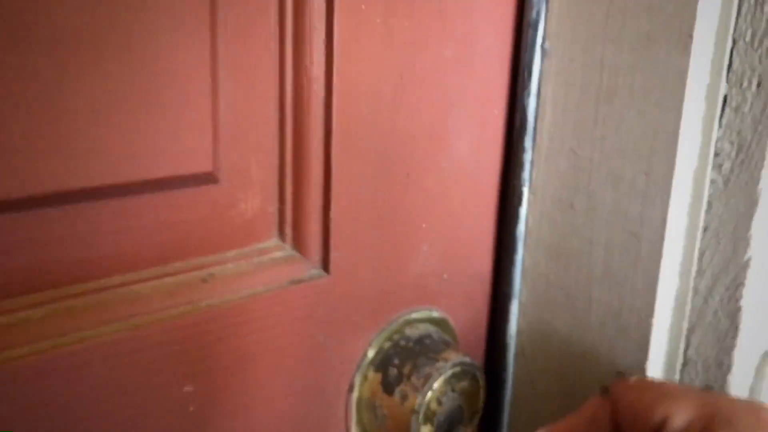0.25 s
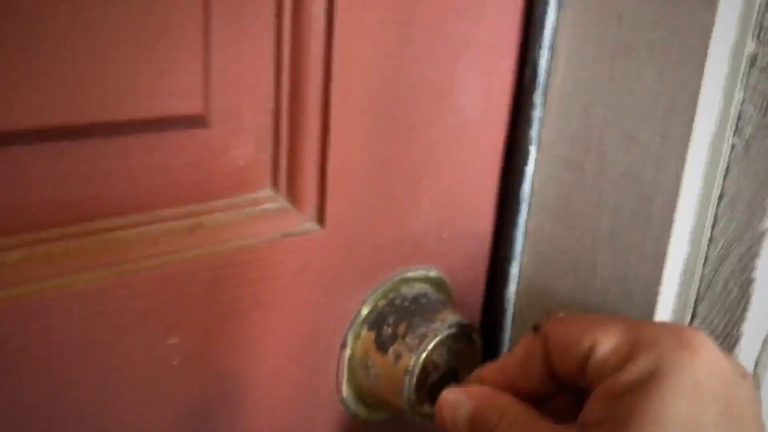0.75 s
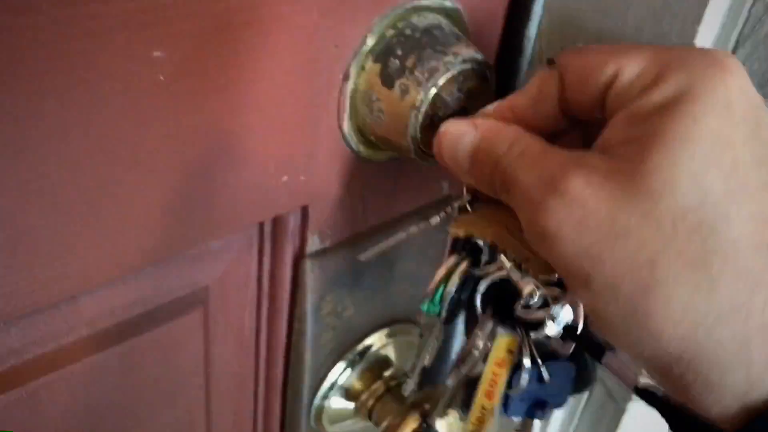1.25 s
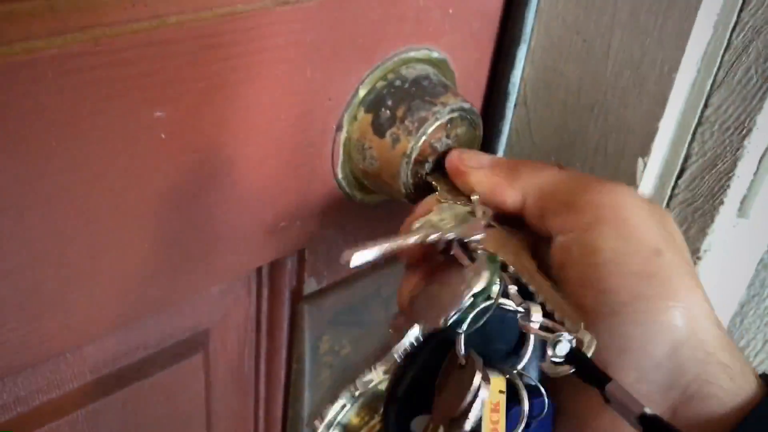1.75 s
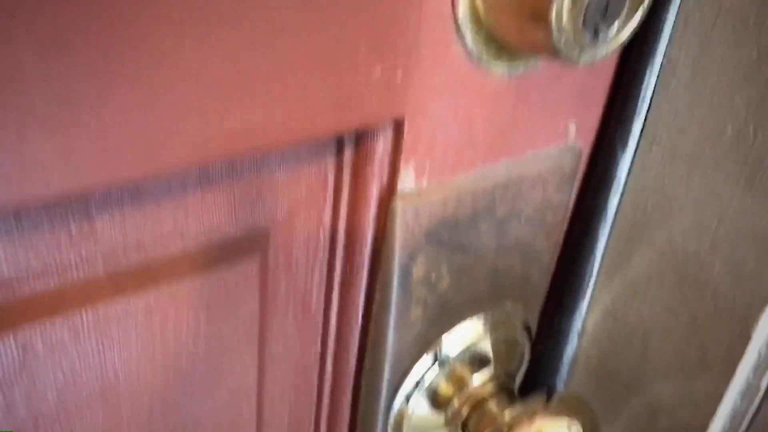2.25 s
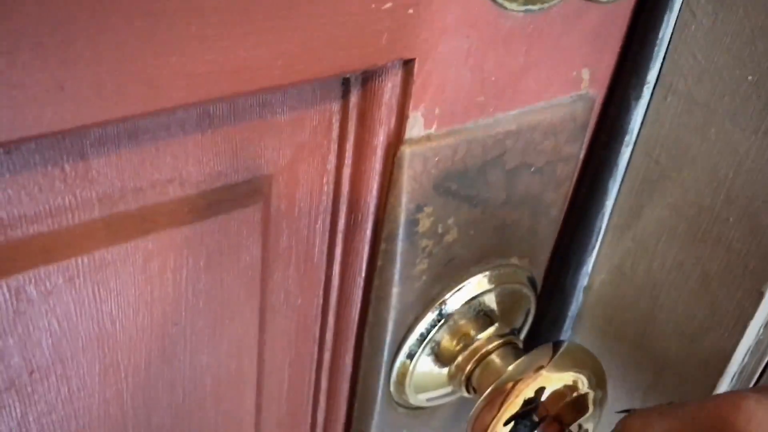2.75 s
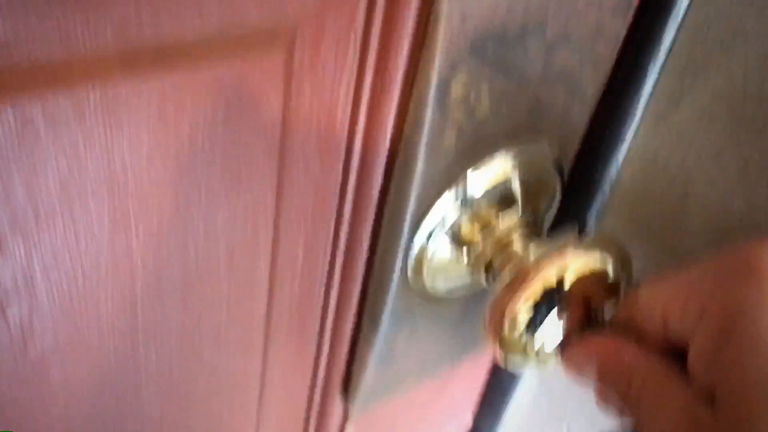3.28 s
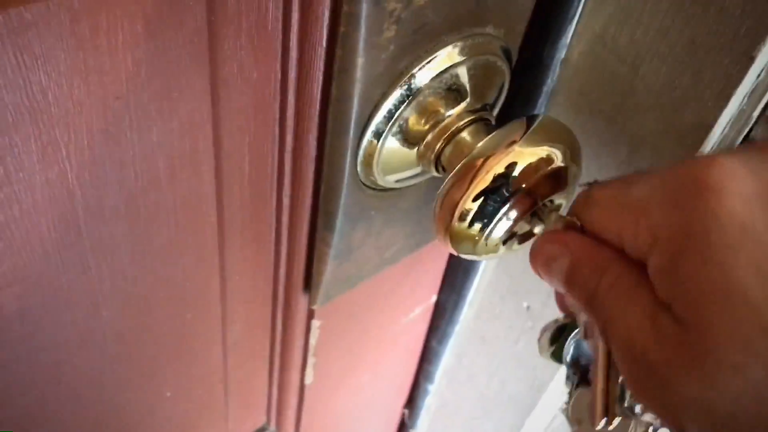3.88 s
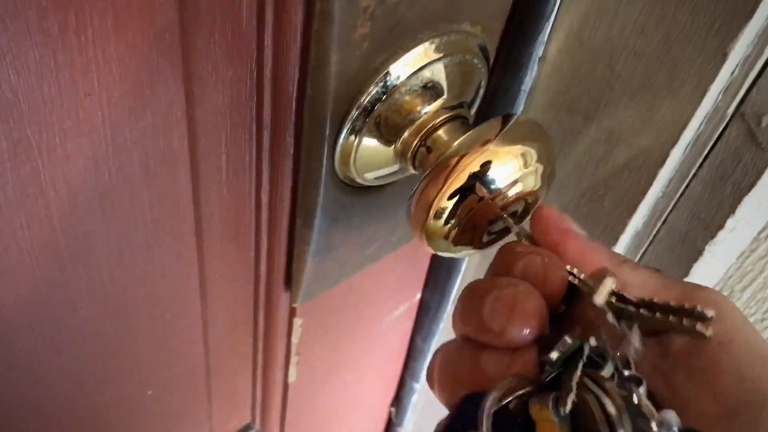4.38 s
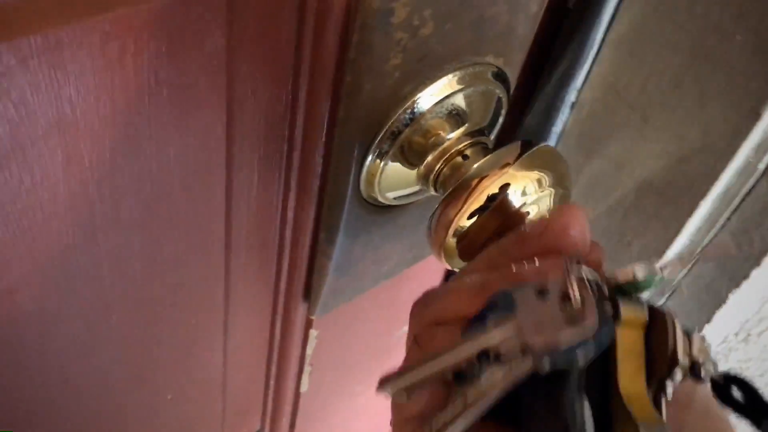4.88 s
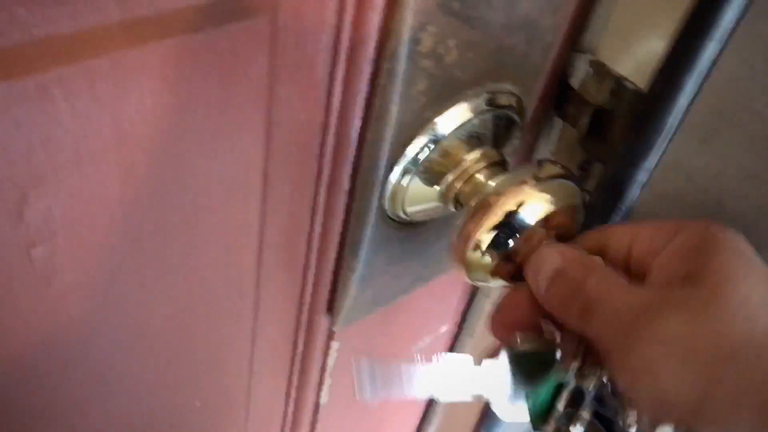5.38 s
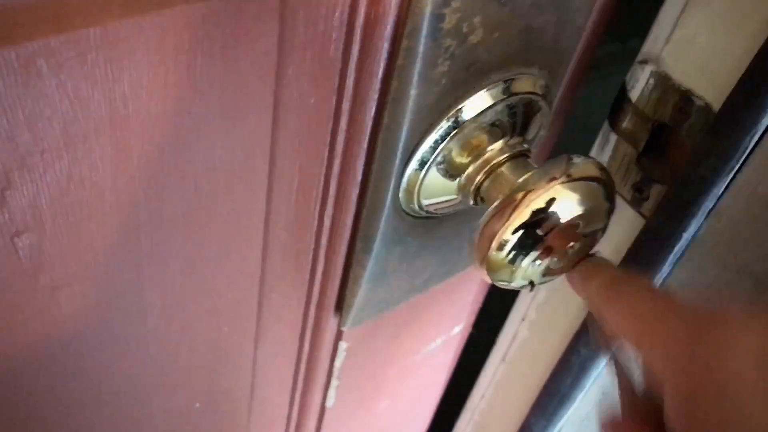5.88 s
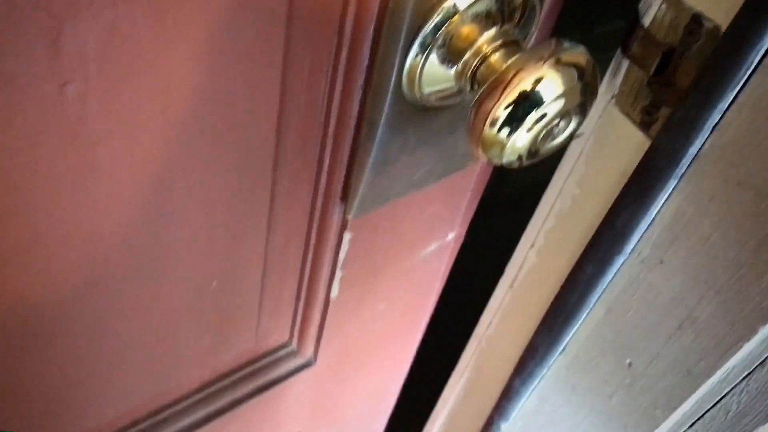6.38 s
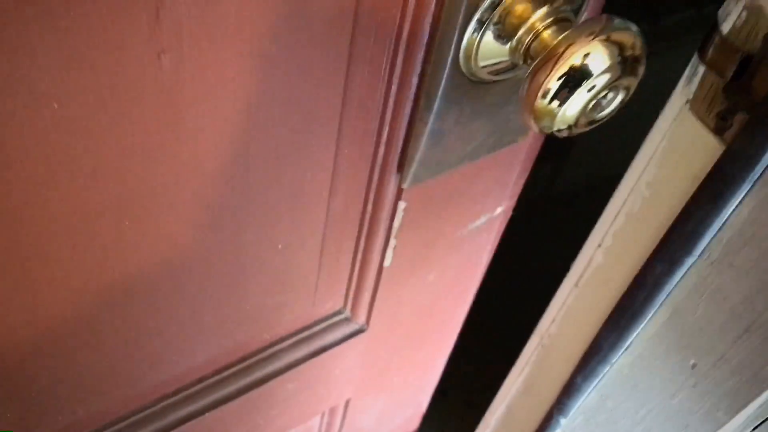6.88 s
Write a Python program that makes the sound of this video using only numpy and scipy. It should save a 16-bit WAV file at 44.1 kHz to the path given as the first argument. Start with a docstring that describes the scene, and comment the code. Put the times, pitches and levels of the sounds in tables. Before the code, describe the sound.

Close, dry lock clicks and key rasps on a solid door, with plastic tags clacking and keys jangling brightly over a faint low outdoor rumble.

```python
"""A faint squeak over a low outdoor rumble opens the scene; then a key knocks in the deadbolt of a wooden front door.
The hand draws it out, unlocks the knob below and lets the bunch swing: keys clink and plastic tags clack.
Locks, door, keys and tags are sums of decaying modes plus shaped noise; the sliding blade is a train of random slips.
Filtered noise makes the outdoor background, and a porch adds a short echo to all the near sounds."""
import sys
import numpy as np
from scipy import signal
from scipy.fft import rfft, irfft, next_fast_len
from scipy.io import wavfile

SR = 44100
rng = np.random.default_rng(int(sys.argv[2]) if len(sys.argv) > 2 else 0)


def wav_out(sig):
    """Save sig, one row per channel (or a flat mono array), as 16-bit PCM at SR to the path in sys.argv[1]."""
    wavfile.write(sys.argv[1], SR, np.round(np.clip(np.atleast_2d(sig).T, -1, 1) * 32767).astype(np.int16))


N = 314874
TIME = np.arange(N) / SR  # s, whole scene
AGE = np.arange(6000) / SR  # s since the start of one impact

# blows inside the locks: t/s, relative strength/dB, hardness/dB (high: steel on steel, low: a dull thud)
LOCK_BLOWS = [(0.345, -20.5, -34), (0.355, -18.5, -41), (0.497, -26, -23), (0.539, -27, -40),
              (0.694, -34, 6), (0.738, -29, -20), (0.777, -25, 11.5), (0.822, -20, -32), (1.025, -30.5, 5),
              (1.043, -29, 5), (1.546, -21, -12), (2.237, -26.5, -18), (2.313, -26, -9), (2.357, -24, -10),
              (2.447, -25, -4), (2.626, -31, -26), (2.659, -24.5, -46), (2.752, -31, -6), (2.796, -29, -1),
              (3.154, -35, 0), (3.186, -24.5, -7), (3.206, -20, -15), (3.301, -19, -2.5),
              (3.48, -21.5, -19), (3.505, -28, -8), (3.63, -36.5, 10), (3.912, -29, 0), (3.996, -29, -0.5),
              (4.302, -15, 9), (4.326, -18.5, -5), (4.686, -25, -25), (4.988, -31, -14.5),
              (5.048, -36.5, 14), (5.325, -25, -1.5), (5.378, -10.5, 0.5), (5.393, -15, -8),
              (5.715, -25.5, -21), (5.826, -26, -72), (5.873, -15, -25), (5.883, -20.5, -12),
              (5.928, -33, 23.5), (5.969, -24, 4), (6.576, -37.5, -25)]
# modes of the door with its locks: f/Hz, width/Hz, relative level/dB
DOOR_MODES = [(599, 40, 8.5), (909, 42, 6.5), (1100, 14.5, 1.5), (1538, 54, 4.5), (1870, 30, -31),
              (2590, 22, -1), (3085, 66, 2), (3580, 55, -14), (4120, 53, 1), (4610, 79, 2), (6110, 67, -15)]
# mean spectra of the dense modes of door panel, brass housing, steel parts and ringing keys: f/Hz, relative level/dB
PANEL_SPECTRUM = [(90, -17), (170, -16), (300, 10.5), (460, -6.5), (900, 1), (1650, 2.5), (2100, -11),
                  (4000, -30)]
HOUSING_SPECTRUM = [(900, -35), (2000, -2.5), (3200, 1.5), (4700, -7.5), (6200, -13), (9000, -27)]
STEEL_SPECTRUM = [(2500, -29), (6000, 3), (9000, 2), (12000, -5), (15500, 1)]
RING_SPECTRUM = [(1500, -26), (4000, -19), (7000, -3.5), (9000, -5.5), (11000, 0), (13500, 3), (15500, 0.5)]
BLOW_T60_S, BLOW_T60_GROWTH = 0.049, 0.0072  # base decay of a hard blow; relative change per dB of hardness below 0
DEADBOLT_BRASS_DB, KNOB_BRASS_DB = -11, -5.5  # offsets of the brass: the hollow knob rings more than the deadbolt
BRASS_PER_HARDNESS = 0.17  # dB per dB
AT_KNOB_S = 2.1  # from here on the knob is struck


def locks():
    """Impact excitation: each blow ticks on steel, rattles the brass housing and sounds the door panel."""
    out = np.zeros(N)
    hz, width, db = np.transpose(DOOR_MODES)
    wood = hz < 2000
    chances = rng.standard_normal((len(LOCK_BLOWS), 7, len(AGE)))
    for (s, panel_db, hardness), chance in zip(LOCK_BLOWS, chances):
        # a hard blow puts more into the metal, a dull one dies sooner
        tick_db = panel_db + hardness
        housing_db = DEADBOLT_BRASS_DB if s < AT_KNOB_S else KNOB_BRASS_DB
        brass_db = panel_db + BRASS_PER_HARDNESS * hardness + housing_db
        t60 = BLOW_T60_S * np.exp(BLOW_T60_GROWTH * min(hardness, 0))

        # the pressing hand detunes the modes a little from blow to blow
        pitch = hz * (1 + 0.013 * chance[5, :len(hz)])
        weight = db + 3 * chance[3, :len(hz)]
        phase = np.pi * chance[4, :len(hz)]
        low = blow(ring(pitch[wood], width[wood], weight[wood], phase[wood]), -5.5)
        high = blow(ring(pitch[~wood], width[~wood], weight[~wood], phase[~wood]), -5.5)

        loose = chatter(chance[6], db=2.0)
        boards = colour(chance[0], peaky(PANEL_SPECTRUM, chance[3], db=2.0)) * loose * fade(2.24 * t60)
        shell = colour(chance[1], peaky(HOUSING_SPECTRUM, chance[4], db=10.5)) * loose * fade(1.22 * t60)
        # panel and brass build up gradually, the panel more slowly
        panel = (low + blow(boards, 0)) * (1 - fade(0.011))
        brass = (high * fade(2 * t60) + blow(shell, 0)) * (1 - fade(0.0036))

        # a loose pin only snaps; steel that bears on the housing goes on ringing with it
        snap = colour(chance[0], RING_SPECTRUM) * fade(0.0055)
        steel = colour(chance[2], peaky(STEEL_SPECTRUM, chance[6], db=-2.5))
        bearing = steel * loose * fade(0.79 * t60)
        tick = blow(snap, tick_db - 17.5) + blow(bearing, (tick_db + brass_db) / 2 - 9)
        add(out, s, blow(panel, panel_db - 11.5) + blow(brass, brass_db - 6.0) + tick)

        # the parts slide briefly before they catch: a decay reversed in time
        slide = colour(chance[5], HOUSING_SPECTRUM) * fade(0.051)
        add(out, s - AGE[-1], blow(slide, brass_db - 18.0)[::-1])
    return out


# strokes of the blade in the keyway: start t/s, end t/s, force/dB
BLADE_STROKES = [(0.487, 0.57, -54), (0.74, 0.859, -41), (1.55, 1.638, -45.5), (1.694, 1.83, -47),
                 (2.72, 2.836, -39), (3.136, 3.256, -40.5), (3.263, 3.358, -40.5), (3.405, 3.53, -48),
                 (3.636, 3.68, -42), (3.745, 3.802, -45), (3.90, 4.047, -45), (4.131, 4.203, -44),
                 (4.224, 4.36, -39), (4.686, 4.722, -39.5), (4.987, 5.076, -44), (5.357, 5.425, -34.5),
                 (5.706, 5.805, -51), (5.868, 5.997, -35)]
# the hand leans on the door and shakes it: start t/s, end t/s, level/dB
DOOR_SHOVES = [(0.35, 0.394, -32.5), (0.74, 0.859, -33), (2.294, 2.39, -44), (2.72, 2.836, -33.5),
               (3.16, 3.358, -33.5), (5.868, 5.997, -31)]
RASP_DB, RASP_SLOPE = -45, 1.4  # bright rasp at the reference force; its growth, dB per dB of force
FORCE_REF_DB = -40


def blade():
    """Stick-slip friction: the cuts of the key catch and slip on the pins, and the push shakes the door."""
    force = strokes(BLADE_STROKES)
    bite = amp(RASP_DB) * (force / amp(FORCE_REF_DB)) ** RASP_SLOPE
    slips = grains(rate=280, spread_db=5.5)

    hz, width, db = np.transpose(DOOR_MODES)
    response = ring(hz, width, db, rng.uniform(0, 2 * np.pi, len(hz)))
    modes = unit(signal.fftconvolve(slips, response)[:N])
    panel = rub(slips, PANEL_SPECTRUM, t60=0.045)
    housing = rub(slips, HOUSING_SPECTRUM, t60=0.012)
    grind = unit(amp(-6.5) * modes + panel + amp(-7.0) * housing)
    rasp = rub(slips, STEEL_SPECTRUM, t60=0.023)

    shake_spectrum = [(22, -23), (42, 7.0), (80, 3.0), (140, 1.0), (320, -9.0), (520, -30), (2000, -70)]
    shake = colour(rng.standard_normal(N), shake_spectrum)
    return force * grind + bite * rasp + strokes(DOOR_SHOVES) * shake


# bending partials, one key a row: f1/Hz, f2/Hz, f3/Hz, f4/Hz
KEY_PARTIALS = [(3960, 7000, 10600, 15240), (2940, 8000, 9400, 14330), (4060, 16000, 11240, 15110),
                (3930, 6950, 11680, 15000), (2840, 6020, 5300, 12450), (4150, 8000, 11000, 14640),
                (5520, 7600, 31000, 15380)]
FREE_RING_DB, FREE_RING_T60_S = -19, 0.16  # what is left ringing once the keys have parted


def key(pitch_hz, t60, crash_db, chance):
    """Contact damping: the struck key rings most, its neighbours and the split ring answer; high and low voice."""
    hz = np.ravel(KEY_PARTIALS)
    lead = np.argmin(abs(hz - pitch_hz))
    owner = np.repeat(np.arange(len(KEY_PARTIALS)), len(KEY_PARTIALS[0]))
    struck = owner == owner[lead]
    # a hard, brief contact favours the high partials
    db = np.where(struck, -8, -19) + 3.5 * chance[0, :len(hz)] + 6 * np.log2(hz / 11000)
    db[lead] = 0
    upper = hz > 5800
    # keys pressed against each other ring off their free pitch
    hz = hz * (1 + np.where(struck, .003, .035) * chance[1, :len(hz)])
    upper = hz > 5800
    phase = np.pi * chance[2, :len(hz)]
    # contact with the bunch damps the key at once; a weak free ring is left
    envelope = fade(t60) + amp(FREE_RING_DB) * fade(FREE_RING_T60_S)
    high = envelope * ring(hz[upper], 0 * hz[upper], db[upper], phase[upper])
    low = envelope * ring(hz[~upper], 0 * hz[~upper], db[~upper], phase[~upper])

    loose = chatter(chance[2], db=5.5)
    crash = colour(chance[3], peaky(RING_SPECTRUM, chance[0], db=6)) * loose * fade(2.08 * t60)
    rattle = colour(chance[4], peaky(HOUSING_SPECTRUM, chance[1], db=14.5)) * loose * fade(1.6 * t60)
    bright = blow(high, db=0.7) + blow(crash, crash_db)
    dark = (blow(low, -5.3) + blow(rattle, 0)) * (1 - fade(0.004))
    return bright, dark


# key against key: t/s, relative level/dB, leading partial f/Hz (the nearest partial of any key takes the lead)
KEY_CLINKS = [(1.687, 1.5, 15200), (1.946, -12, 14600), (2.0538, -26, 10700), (2.0692, -18.5, 6000),
              (2.0923, -22.5, 11500), (2.2342, -13, 14300), (2.448, -19.5, 11300), (2.5335, -11.5, 14300),
              (3.3124, -25, 10600), (3.7233, -25.5, 10600), (3.795, -30.5, 11900), (4.0846, -32, 10700),
              (4.461, -10, 14600), (4.486, -20, 14300), (4.5486, -16, 13800), (4.59, -18.5, 14700),
              (4.7643, -21.5, 11700), (4.783, -26, 14200), (4.804, -20.5, 14200), (5.124, -13.5, 14800),
              (5.2234, -24, 9420), (5.5968, -21.5, 15600), (5.9433, -19, 14900), (6.0392, -7, 10700),
              (6.056, -6, 14200), (6.085, -11.5, 14700), (6.1014, -15, 14700), (6.1413, -20, 15000),
              (6.205, -24, 15600), (6.2775, -19, 14700), (6.3933, -28, 10600), (6.657, -10, 12400),
              (6.7213, -15, 15200), (6.7551, -4, 15300), (6.7686, -11, 15200), (6.7734, -1.5, 15200),
              (6.7846, -7.5, 15200), (6.8166, -8.5, 14400), (6.936, -26.5, 14700)]
CLINK_REF_DB = -20
CLINK_LOW_DB, CLINK_LOW_SLOPE = -38.5, 0.44  # base level of the low partials; they grow more slowly, dB per dB
CRASH_DB, CRASH_SLOPE = -0.5, 0.075  # clatter of other keys at the reference; dB per dB, so light taps ring purer
HELD_T60_S, FREE_T60_S = 0.033, 0.062  # main decay while the fingers hold the bunch, and once it swings free
KEY_OUT_S = 6.0


def keys():
    """Nonlinear impact and damping: harder clinks are brighter and noisier, free keys ring longer than held ones."""
    out = np.zeros(N)
    chances = rng.standard_normal((len(KEY_CLINKS), 5, len(AGE)))
    for (s, db, hz), chance in zip(KEY_CLINKS, chances):
        harder = db - CLINK_REF_DB
        t60 = HELD_T60_S if s < KEY_OUT_S else FREE_T60_S
        high, low = key(hz, t60, CRASH_DB + CRASH_SLOPE * harder, chance)
        low_db = CLINK_LOW_DB + CLINK_LOW_SLOPE * harder - 8.5
        add(out, s, blow(high, db - 13.0) + blow(low, low_db))
    return out


# plastic tags: t/s, relative level/dB, favoured resonance f/Hz
TAG_CLACKS = [(1.4012, -18.5, 4070), (1.459, -20.5, 4100), (1.662, -16, 4150), (1.7774, -18.5, 4160),
              (1.7926, -13.5, 5000), (1.8695, -26, 4200), (1.8931, -23.5, 2800), (4.4243, -12.5, 1990),
              (4.4449, -4, 1930), (4.4496, -1, 1870), (4.479, -23, 2000), (4.4835, -3.5, 1830),
              (4.4972, -7.5, 1870), (4.5074, -16, 2170), (4.5197, -12.5, 1980), (4.5363, -12.5, 4230),
              (4.552, -12, 1870), (4.6444, -19, 1880), (4.6773, -16, 2040), (4.758, -21, 2020),
              (4.8016, -12.5, 1910), (5.158, -10, 2140), (6.16, -26, 1660), (6.8185, -13.5, 4100)]
# modes of a plastic tag: f/Hz, width/Hz, relative level/dB
TAG_MODES = [(1872, 64, -3.5), (2114, 88, -1), (2800, 99, -1), (3786, 430, -4), (4155, 290, 4),
             (5400, 500, -41), (7900, 350, -10)]
# rattle of the neighbouring tags: f/Hz, relative level/dB
TAG_RATTLE_SPECTRUM = [(900, -22), (1550, -5.5), (1850, -8.5), (2200, -27), (2500, -26), (4200, -5),
                       (6000, -18), (12000, -24)]


def tags():
    """High internal loss: stiff plastic rings a few cycles; where it is hit and held sets pitch and leading mode."""
    out = np.zeros(N)
    hz, width, db = np.transpose(TAG_MODES)
    chances = rng.standard_normal((len(TAG_CLACKS), 5, len(AGE)))
    for (s, level_db, lead_hz), chance in zip(TAG_CLACKS, chances):
        favour = 8 * np.exp(-(np.log(hz / lead_hz) / 0.22) ** 2)
        weight = db + favour + 2.6 * chance[0, :len(hz)]
        pitch = hz * (1 + 0.029 * chance[3, :len(hz)])
        # soft plastic pushes for about a cycle before it lets go
        body = ring(pitch, width, weight, 0.28 * chance[1, :len(hz)]) * (1 - fade(0.0014))
        # the tags hanging next to it rattle on
        rattle = colour(chance[4], TAG_RATTLE_SPECTRUM) * chatter(chance[3], db=11.5)
        rattle = rattle * (fade(0.038) - fade(0.013))
        contact = colour(chance[2], STEEL_SPECTRUM) * fade(0.013)
        clack = blow(body, 0) + blow(rattle, -7.5)
        add(out, s, blow(clack, level_db - 17.0) + blow(contact, level_db - 26.5))
    return out


# small squeaks, pings and faint after-rings: t/s, first f/Hz, settled f/Hz, level/dB, t60/s
PITCHED_PINGS = [(0.12, 1800, 1674, -36, 0.065), (0.384, 1970, 1866, -49.5, 0.79),
                 (0.84, 3380, 3420, -68.5, 3.7), (1.439, 1200, 944, -34, 0.048),
                 (1.69, 7070, 6910, -26, 0.078), (1.946, 3920, 3920, -55.5, 0.4),
                 (6.291, 3940, 3610, -47, 0.037), (6.319, 1840, 2240, -37, 0.028),
                 (6.745, 4080, 4150, -37.5, 0.15)]


def plinks():
    """Pitch glide: faint squeaks and pings settle exponentially on their pitch within a few cycles."""
    out = np.zeros(N)
    age = TIME[:SR]
    for s, first_hz, hz, db, t60 in PITCHED_PINGS:
        pitch = hz + (first_hz - hz) * np.exp(-age / 0.0014)
        envelope = amp(-60 * age / t60) * (1 - np.exp(-age / .002))
        tone = np.sin(2 * np.pi * np.cumsum(pitch) / SR)
        add(out, s, blow(tone * envelope, db))
    return out


# swings of the bunch: t/s of the liveliest moment, relative level/dB, time to swell by a factor e/s
BUNCH_SWINGS = [(1.85, -50, 0.51), (3.44, -50, 0.026), (3.8, -57, 0.25), (4.3, -26, 0.033),
                (4.5, -32.5, 0.13), (4.79, -34.5, 0.049), (5.2, -36, 0.11), (5.5, -39.5, 0.42),
                (6.09, -38.5, 0.19), (6.42, -44.5, 0.16), (6.79, -31.5, 0.093)]
HANGING_DB = -62.5  # relative level of the stirring between swings
SETTLE_SHARE = 0.36  # a swing settles in this share of the time it takes to swell


def liveliness():
    """Exponential growth and decay: the bunch stirs up to the height of each swing, then settles; powers add."""
    power = amp(HANGING_DB) ** 2
    for s, db, swell_s in BUNCH_SWINGS:
        exponent = np.minimum(TIME - s, (s - TIME) / SETTLE_SHARE) / swell_s
        power = power + (amp(db) * np.exp(exponent)) ** 2
    return np.sqrt(power)


# grating of the rings: f/Hz, relative level/dB
GRATE_SPECTRUM = [(900, -3), (2000, -1), (4200, -10.5), (6500, 2), (12000, -1.5), (15500, -4)]


def stirring():
    """Random excitation: every key brushes its neighbours lightly, and the rings grate."""
    brushes = 0
    for partials in KEY_PARTIALS:
        high, low = key(partials[-1], 0.035, CRASH_DB, rng.standard_normal((5, len(AGE))))
        brush = blow(high, 0) + blow(low, 0.68)
        brushes = brushes + signal.oaconvolve(grains(rate=9.4, spread_db=6.5), brush)[:N]
    grating = rub(grains(rate=200, spread_db=11.0), GRATE_SPECTRUM, t60=0.047)
    return (unit(brushes) + amp(-6.0) * grating) * liveliness() * amp(-4.0)


def porch(x, wet_db, t60):
    """Reverberation: frame, floor and roof return a short, duller echo."""
    noise = colour(rng.standard_normal(len(AGE)), [(100, 5.0), (1000, -4), (4000, -5.5), (15000, -11.5)])
    echo = noise * (fade(t60) - fade(0.034))
    echo = echo / np.sqrt(np.sum(echo ** 2))
    return x + amp(wet_db) * signal.fftconvolve(x, echo)[:N]


# drift of the outdoor background: t/s, rumble level/dB, relative level of the middle range/dB
OUTDOOR_LEVELS = [(0.0, -40.5, -50), (1.5, -41.5, -50.5), (3.3, -40.5, -51.5), (3.9, -40.5, -55),
                  (4.7, -42.5, -52.5), (5.5, -40, -48), (6.2, -42.5, -56), (7.14, -42.5, -52.5)]
# spectra of the rumble and of the air: f/Hz, relative level/dB
RUMBLE_SPECTRUM = [(20, -34.5), (40, -10.5), (75, -0.5), (140, -4), (280, -14.5), (450, -25.5), (1000, -35),
                   (4000, -40.5), (16000, -48.5)]
AIR_SPECTRUM = [(250, -4.5), (560, -4.5), (1300, -1.5), (1650, -1.5), (2100, -12.5), (3400, -15),
                (5000, -27)]


def outdoors():
    """Filtered noise: a low rumble and a softer rush of air above it, both drifting slowly in level."""
    s, rumble_db, air_db = np.transpose(OUTDOOR_LEVELS)
    rumble = colour(rng.standard_normal(N), RUMBLE_SPECTRUM) * amp(np.interp(TIME, s, rumble_db))
    air = colour(rng.standard_normal(N), AIR_SPECTRUM) * amp(np.interp(TIME, s, air_db) - 4.0)
    return rumble + air


def ring(hz, width_hz, db, phase):
    """Modal superposition: a sum of sines, each decaying at a rate set by its width."""
    angle = np.float32(2 * np.pi * np.outer(hz, AGE) + phase[:, None])
    loss = np.float32(np.minimum(np.pi * np.outer(width_hz, AGE), 20))
    return amp(db) @ (np.sin(angle) * np.exp(-loss))


def chatter(chance, db):
    """Intermittent contact: loose parts touch again and again, so the gain wanders every millisecond or two."""
    return amp(db * np.interp(AGE, np.arange(len(chance)) * 0.001526, chance))


def peaky(spectrum, chance, db):
    """Modal excitation: where a part is hit decides which of its many modes stand out of its mean spectrum."""
    hz, mean_db = np.transpose(spectrum)
    grid = np.arange(60, SR / 2, 140)
    smooth_db = np.interp(np.log(grid), np.log(hz), mean_db)
    return np.transpose([grid, smooth_db + db * np.clip(chance[-len(grid):], -1, 2)])


def grains(rate, spread_db):
    """Random point process: clicks at chance moments (rate per second), of uneven size and either sign."""
    clicks = (rng.random(N) < rate / SR) * rng.choice([-1, 1], N)
    return clicks * amp(spread_db * np.minimum(rng.standard_normal(N), 2))


def rub(slips, spectrum, t60):
    """Energy decay: each slip lets out a short puff of noise."""
    energy = signal.oaconvolve(slips ** 2, fade(t60) ** 2)[:N]
    return unit(np.sqrt(abs(energy)) * colour(rng.standard_normal(N), spectrum))


def strokes(rows):
    """Force envelope: each push of the hand swells and eases off in one arch."""
    total = np.zeros(N)
    for start, end, db in rows:
        progress = np.clip((TIME - start) / (end - start), 0, 1)
        total += amp(db) * np.sqrt(abs(np.sin(np.pi * progress)))
    return total


def colour(x, spectrum):
    """Spectral shaping: weight a sound by points of (f/Hz, level/dB), joined over log frequency; rms 1."""
    hz, db = np.transpose(spectrum)
    size = next_fast_len(len(x))
    bins = np.maximum(np.arange(size // 2 + 1) * SR / size, 1)
    gain = amp(np.interp(np.log(bins), np.log(hz), db))
    return unit(irfft(rfft(x, size) * gain, size)[:len(x)])


def fade(t60):
    """Exponential decay: 60 dB down after t60 seconds."""
    return np.exp(-np.log(1000) * AGE / max(t60, 1e-3))


def amp(db):
    """Logarithmic level: decibels to gain."""
    return 10 ** (np.asarray(db) / 20)


def unit(x):
    """Effective value: scale to rms 1."""
    return x / np.sqrt(np.mean(x ** 2))


def blow(x, db):
    """Onset level: scale a blow so that the rms of its first hundredth of a second has this level."""
    return x * amp(db) / np.sqrt(np.mean(x[:SR // 100] ** 2))


def add(track, s, sound):
    """Linear superposition: mix a sound in at a time."""
    start = int(s * SR)
    track[start:start + len(sound)] += sound[:N - start]


def scene():
    """Superposition: all near sources with the porch echo, plus the outdoor background, in one channel."""
    near = locks() + blade() + keys() + tags() + plinks() + stirring()
    return (porch(near, wet_db=-15, t60=0.32) + outdoors())[None]


def record(dry):
    """Band limiting: a steep elliptic low-pass removes the top above 15.9 kHz."""
    low_pass = signal.ellip(10, .2, 70, 15900, fs=SR, output="sos")
    return signal.sosfilt(low_pass, dry)


dry = scene()
out = record(dry)
wav_out(out)
```